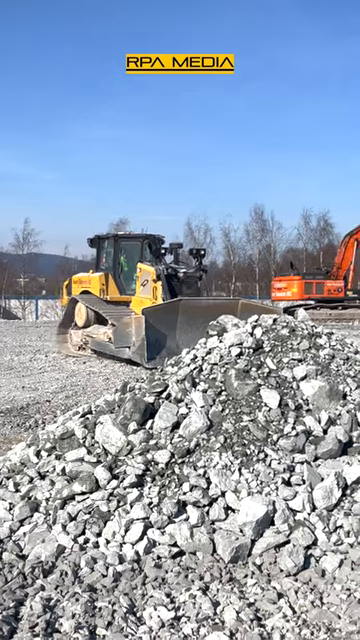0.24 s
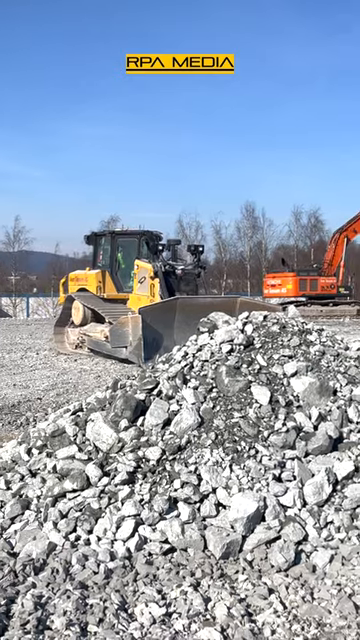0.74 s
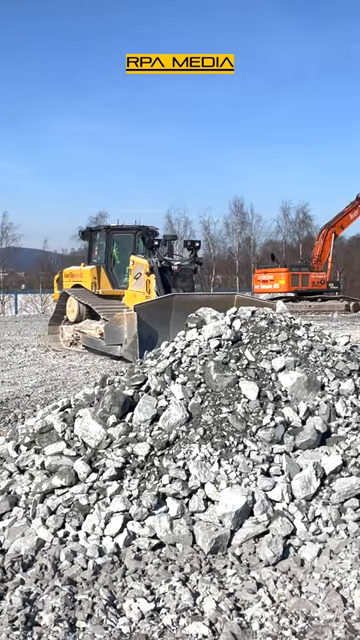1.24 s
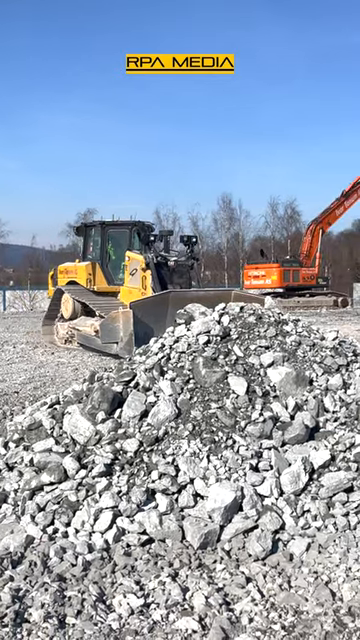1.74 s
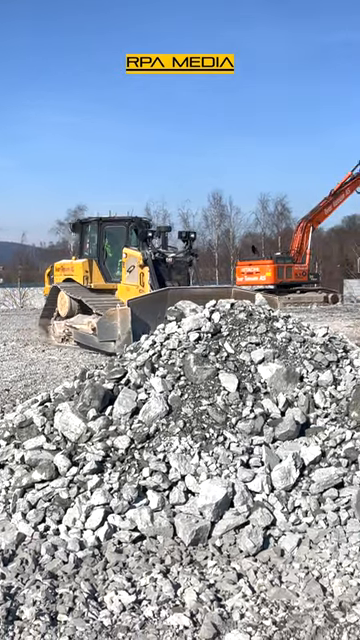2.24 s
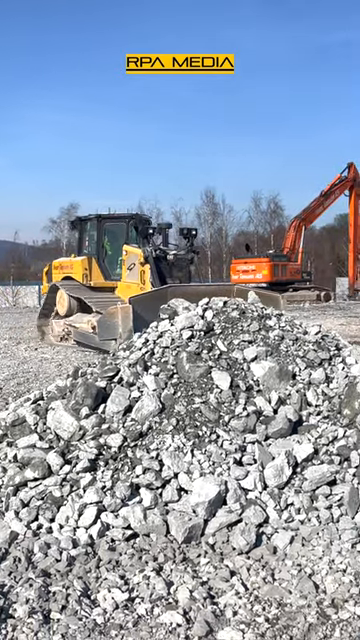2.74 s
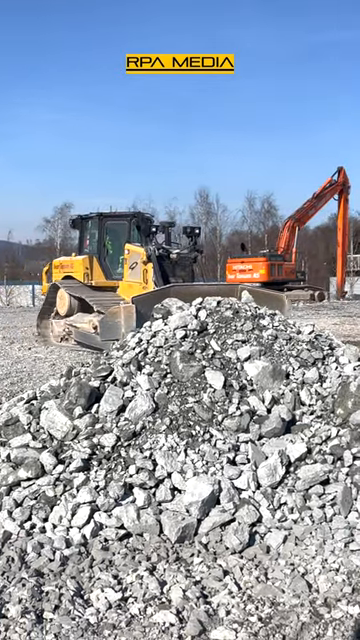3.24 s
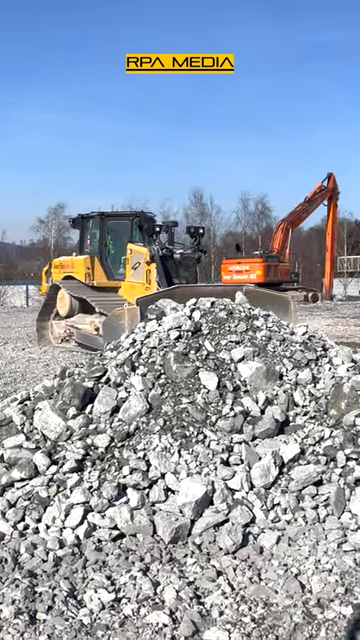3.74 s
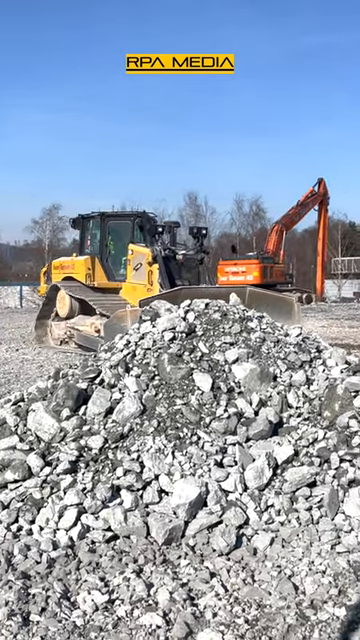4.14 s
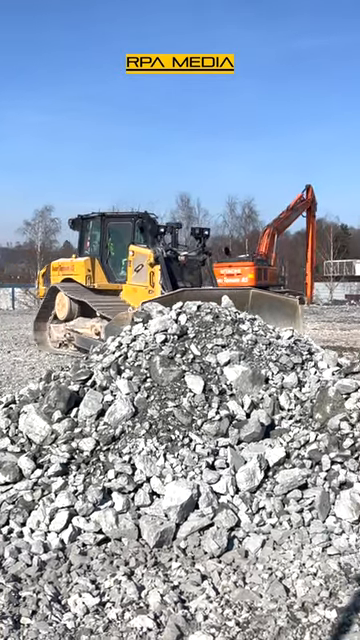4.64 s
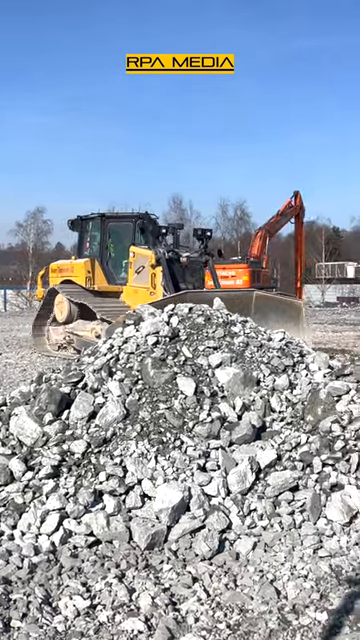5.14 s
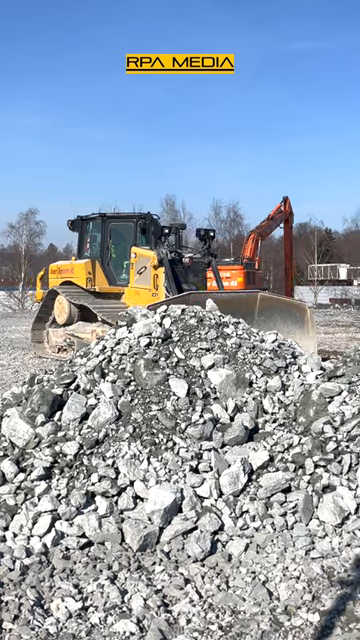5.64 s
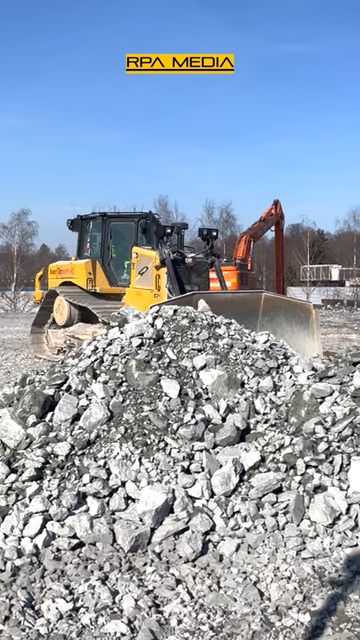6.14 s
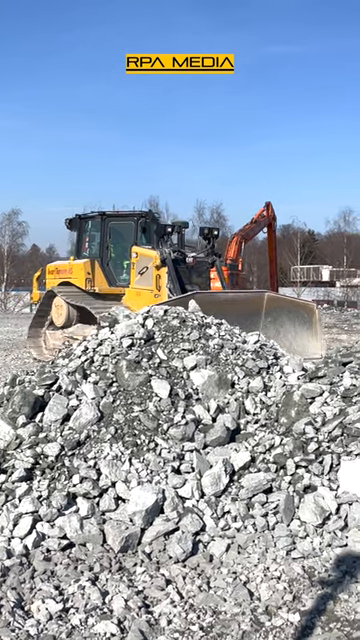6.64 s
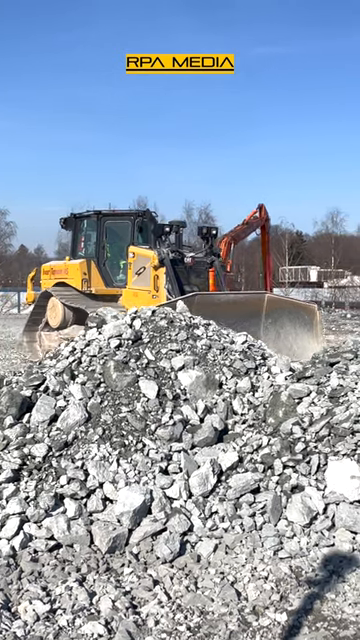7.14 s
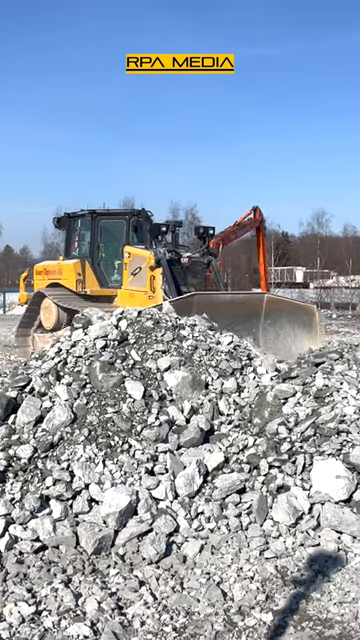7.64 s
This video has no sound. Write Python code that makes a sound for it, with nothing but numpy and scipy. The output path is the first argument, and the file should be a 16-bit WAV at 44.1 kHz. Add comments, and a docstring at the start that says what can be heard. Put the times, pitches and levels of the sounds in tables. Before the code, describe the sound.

Stones knock, grate and tumble ahead of a crawler dozer, over clanking track links, a steady engine and light wind buffeting.

```python
"""A crawler dozer shoves broken stone across a yard, heard from a little way off on one microphone.
Its six-cylinder diesel drones as firing pulses ring the exhaust pipe; steel track links slam home over
the sprockets and dry pins squeak. Stones knock, crunch, split and chink at the blade and grate along it
in stick-slip. Gusts buffet the microphone, whose signal is widened to two channels by a filter with a
slight wobble in phase."""
import sys
import numpy as np
from scipy import signal
from scipy.fft import rfft, irfft, next_fast_len
from scipy.io import wavfile
from scipy.ndimage import uniform_filter1d

SR = 44100
rng = np.random.default_rng(int(sys.argv[2]) if len(sys.argv) > 2 else 0)


def master_out(mix):
    """Clip the mix to full scale and print it as 16-bit PCM to the path in sys.argv[1]."""
    frames = np.transpose(np.atleast_2d(mix))
    ceiling = np.clip(frames, -1, 1)
    pcm = np.round(ceiling * 32767).astype(np.int16)
    wavfile.write(sys.argv[1], SR, pcm)


N = 347949

# diesel, slowing a little as the load grows: (time [s], firing rate [Hz], rumble [dB], deep hum [dB])
DIESEL_RUN = [(0.0, 94.3, -23.5, -49), (0.83, 94.9, -25.5, -31), (1.78, 94.9, -24.5, -36),
              (2.0, 91.9, -27, -31), (3.43, 94.7, -24.5, -27.5), (3.8, 91.7, -27.5, -29),
              (4.61, 94.3, -25.5, -33.5), (5.07, 92.26, -25.5, -26.5), (6.61, 92.7, -22, -31),
              (6.9, 88.2, -20.5, -22), (7.08, 91.4, -21.5, -31), (7.54, 90.6, -22, -31),
              (7.62, 97.5, -18, -33), (7.89, 89.8, -22, -28)]
# the six firings of one cycle: (relative strength [dB])
FIRING_DB = [2, -19, 4, -14, 5, -8]
# crankshaft tones beside the firing tone, which is order 3: (order [per turn], level [dB])
CRANK_TONES = [(2.5, -39), (4, -39.5), (5, -38.5)]
# exhaust pipe resonances: (frequency [Hz], width [Hz], relative level [dB])
PIPE_MODES = [(50, 3.7, -15), (119, 29.5, 12.5), (154, 110, -23), (198, 16, 10.5), (253, 5, -26)]
# whine of the gears: (frequency [Hz], width [Hz], level [dB])
GEAR_BANDS = [(1710, 4, -48)]
# spectra of engine rumble and cooling fan: (frequency [Hz], relative level [dB])
RUMBLE_SPECTRUM = [(25, -32), (38, -18), (52, -4.5), (75, 4), (110, 0.5), (170, -5.5), (260, -3.5),
                   (400, -27)]
FAN_SPECTRUM = [(300, -5), (800, 19.5), (2000, -12), (4000, -7), (6000, -2), (9000, -0.5), (12000, -10)]

# track links slamming home: (time [s], relative level [dB], brightest at [Hz], relative thud [dB])
LINK_BLOWS = [(0.088, -6, 696, -18), (0.25, -6, 988, -25), (0.279, -9.5, 2560, -14),
              (0.456, -11, 1230, -27), (0.617, -8.5, 746, -14), (0.683, 0, 1690, -18),
              (0.747, -7.5, 1930, 2), (1.004, -0.5, 1080, -11), (1.171, -7, 715, -1),
              (1.201, -2.5, 1850, -31), (1.282, -7, 1860, -30), (1.413, -12.5, 2260, 3),
              (1.489, -7, 2830, -14), (1.541, 2, 1780, -5.5), (1.865, 0.5, 1280, -30),
              (1.936, -6.5, 666, -28), (2.101, -13, 1845, 1), (2.142, -11, 622, -24), (2.251, -10, 2220, 2),
              (2.281, -14, 673, 9.5), (2.392, -2.5, 710, -24), (2.478, -13, 627, 2),
              (2.699, -8.5, 1190, -24), (2.872, -12, 705, -13), (2.982, -8, 800, 2),
              (3.126, -16, 1010, -19), (3.262, -9, 800, -2), (3.306, -16, 1710, -37),
              (3.409, -14.5, 651, -23), (3.545, -14.5, 921, 7), (3.673, -12, 1680, -24),
              (3.792, -13.5, 872, -2), (3.924, -14.5, 676, -24), (4.061, -15, 1200, -15),
              (4.089, -12.5, 800, 7), (4.232, -12, 950, -12), (4.361, -15, 650, 6.5), (4.622, -15, 910, -1),
              (4.654, -15, 600, 9), (4.684, -12, 977, -4), (4.782, -11, 1180, -17),
              (4.934, -10.5, 643, -20), (5.19, -9.5, 740, 2), (5.336, -10, 955, -14),
              (5.469, -17.5, 755, 7), (5.641, -9.5, 616, -32), (5.748, -7, 651, -13),
              (5.887, -8.5, 823, -18), (5.938, -5.5, 724, -20), (6.159, -19, 700, 12),
              (6.242, -35, 606, -12), (6.297, -23, 600, -5), (6.4, -31, 739, -29), (6.433, -12, 2200, -25),
              (6.484, -13.5, 1860, 3), (6.54, -15, 2350, -18), (6.719, -8, 599, -25),
              (6.809, -28, 1730, -32.5), (6.928, -17, 631, -12), (6.994, -7, 627, -15),
              (7.169, -10, 654, -12), (7.229, -5, 1920, 1.5), (7.466, -19, 600, 11.5), (7.614, -14, 740, 8),
              (7.683, -23, 759, -15), (7.721, -24, 3030, 2), (7.824, -10.5, 3440, 10)]
# modes of a track link: (frequency [Hz], relative level [dB], t60 when struck hard [s])
LINK_MODES = [(520, -7, .05), (646, -3, .07), (716, -4, .07), (830, -7, .05), (947, -5, .05),
              (1030, -5, .05), (1180, -6, .05), (1320, -6, .05), (1530, -10, .04), (1750, -10, .06),
              (1879, -3.5, .1), (1960, -7, .07), (2137, -9, .1), (2260, -11, .1), (2470, -11, .1),
              (2848, -6, .12), (3004, -11, .1), (3160, -8, .07), (3370, -10, .07), (3620, -13, .06),
              (3900, -14, .06)]
# links hanging free after a blow: (time [s], frequency [Hz], level [dB], t60 [s])
FREE_LINKS = [(.686, 1913, -15, 0.17), (0.689, 3050, -25, .2), (.69, 687, -16, 0.24),
              (0.751, 1950, -30, 0.12), (1.008, 2864, -19, 0.28), (1.015, 1870, -25, 0.25),
              (1.005, 997, -20, 0.15), (1.172, 720, -13.5, .08), (1.203, 1860, -36, 0.28),
              (1.225, 3010, -22, 0.45), (1.283, 1870, -20.5, 0.19), (1.285, 2095, -22, 0.26),
              (1.54, 1930, -31, 0.13), (1.543, 2840, -23, 0.22), (1.867, 1900, -17, 0.33),
              (1.868, 3230, -23, 0.25), (1.935, 3400, -23, 0.097), (2.155, 3140, -23, 0.072),
              (2.394, 1900, -23, 0.61), (2.393, 2840, -20, 0.2), (2.475, 3370, -32, 0.09),
              (7.23, 3200, -18, 0.13), (7.23, 2180, -22, 0.091), (7.232, 944, -20, .1),
              (.687, 1237, -22, 0.24), (0.753, 1280, -20, .1), (1.543, 672, -14.5, 0.13),
              (1.867, 1004, -17, 0.21), (2.394, 1015, -19.5, 0.13), (2.699, 1217, -20, 0.11),
              (2.699, 685, -20.5, 0.16), (2.701, 1842, -28, .1), (2.701, 3200, -28, .08),
              (2.872, 1300, -26, 0.067), (2.98, 3150, -21, 0.094), (2.984, 2150, -25, .08),
              (3.178, 1660, -23, 0.074), (0.278, 2500, -18, 0.18), (3.268, 1054, -23, .1),
              (3.305, 1660, -18.5, 0.092), (3.673, 2900, -26, .1), (3.922, 1840, -22, 0.063),
              (3.96, 1180, -23, .08), (4.09, 740, -26, 0.24), (4.234, 1010, -29, .1),
              (4.783, 1160, -21, .08), (5.337, 1800, -24, .08), (5.342, 1300, -22, .08)]
# dry track pins: (time [s], length [s], frequency [Hz], width [Hz], level [dB])
PIN_SQUEAKS = [(.57, .12, 13500, 130, -38), (.87, .1, 13450, 120, -47), (1.22, .09, 13500, 130, -38),
               (1.43, .16, 13470, 130, -38), (.02, .12, 13500, 120, -41), (1.05, .13, 13500, 120, -48),
               (1.96, .18, 13500, 80, -43), (1.13, .11, 9000, 60, -32), (1.75, .15, 9100, 50, -36),
               (.28, .17, 9110, 40, -39), (0, .12, 8130, 40, -35), (.15, .2, 8130, 40, -39),
               (.03, .12, 4500, 150, -33), (.82, .05, 10090, 60, -41), (.015, .08, 5100, 50, -33),
               (.27, .08, 5050, 60, -35)]

# steady roll of the heap: (time [s], big stones [dB], crunch on the blade [dB], grit [dB], fine grit [dB])
HEAP_ROLL = [(0.0, -27.5, -26, -26.5, -31), (0.17, -26, -28.5, -29.5, -35.5),
             (0.42, -27.5, -32, -39.5, -44.5), (1.32, -31, -30, -34, -37), (1.65, -26, -34, -42, -54),
             (2.0, -29, -32, -36, -43), (2.52, -26.5, -36, -53, -65), (2.94, -30.5, -37, -58.5, -60),
             (3.29, -25.5, -34, -46, -65), (4.04, -29, -37, -48, -59), (5.56, -26, -33.5, -40.5, -66),
             (6.5, -21.5, -26.5, -30, -46), (6.64, -19.5, -27, -30, -56), (6.97, -22.5, -24, -27, -46),
             (7.19, -22, -29.5, -32, -46), (7.45, -25.5, -35, -40, -57), (7.74, -21.5, -28.5, -31, -45),
             (7.89, -19, -21.5, -25.5, -49)]
# gravel off a track shoe or the heap:
# (time [s], length [s], grit [dB], fine grit re grit [dB], crunch re grit [dB])
GRAVEL_SPILLS = [(0.061, 0.086, -24.5, -16, -4), (0.224, 0.18, -27.5, -2, 2), (0.507, 0.035, -37, -14, 7.5),
                 (0.639, 0.11, -30, -3.5, 0), (0.824, 0.29, -31, -4, -3), (1.115, 0.15, -28.5, -8, -18),
                 (1.32, 0.04, -29, -6, -3), (1.41, 0.065, -32.5, -9, 3), (1.477, 0.1, -30.5, -5.5, 2),
                 (1.606, 0.039, -37, 2, 2), (1.714, 0.032, -27, -3, 3), (1.765, 0.072, -31, -15, 1),
                 (1.854, 0.038, -29, -19, 9.5), (1.957, 0.17, -34, -2, -1), (2.148, 0.061, -34, -6, -2),
                 (2.243, 0.13, -37.5, -7, 9), (2.383, 0.026, -33, -6, 17), (2.44, 0.038, -41.5, 2, 13),
                 (2.627, 0.031, -41, -9, 5), (2.682, 0.13, -38.5, -8, 7), (2.847, 0.19, -36, -6, 2),
                 (3.12, 0.086, -38.5, -20, 10), (3.2, 0.074, -39, -7, 7), (3.338, 0.043, -34.5, -16, 1),
                 (3.4, 0.065, -40.5, -4, 8), (3.522, 0.14, -39, -9, 7), (3.65, 0.046, -31, -11, 1.5),
                 (3.705, 0.038, -35, -9, -6), (3.915, 0.066, -38, -7, 6), (4.05, 0.071, -33.5, -12, 2),
                 (4.212, 0.054, -37, -7, 4), (4.346, 0.039, -34, -5, -3), (4.509, 0.028, -36, -9, -7),
                 (4.617, 0.078, -39, -9, -5), (4.714, 0.033, -41, -11, 3), (4.76, 0.079, -41, -7, -1),
                 (4.913, 0.037, -34.5, -8, 0), (4.97, 0.067, -35, -19, 7), (5.054, 0.044, -35, -12.0, -4),
                 (5.178, 0.08, -33, -12, -5), (5.298, 0.058, -34.5, -1.5, 0),
                 (5.389, 0.031, -31.5, -16, -1), (5.455, 0.033, -37, -8, 3), (5.49, 0.047, -35.5, -23, 3),
                 (5.62, 0.091, -32, -11, -2), (5.737, 0.05, -29, -12, 4.5), (5.888, 0.105, -28, -12, 1.5),
                 (6.01, 0.098, -28.5, -14, 7), (6.13, 0.044, -36, -11, 5), (6.225, 0.068, -25.5, -48, -10),
                 (6.295, 0.046, -29.5, -16, 6), (6.46, 0.14, -25.5, -9, 3), (6.595, 0.05, -28.5, -13, 6),
                 (6.705, 0.074, -21.5, -35, -1), (6.833, 0.068, -26, -23, -13),
                 (6.913, 0.036, -27, -34, -13), (7.041, 0.12, -23, -20, -3.5), (7.22, 0.024, -29, -23, -2),
                 (7.331, 0.12, -33.5, -15.0, 6), (7.434, 0.065, -32.5, -9, 5),
                 (7.608, 0.032, -32, -18.0, -8), (7.718, 0.058, -28, -22, -8),
                 (7.813, 0.028, -23, -16, 4.5)]
# spectra of the four sizes of stone, largest first: (frequency [Hz], relative level [dB])
KNOCK_SPECTRUM = [(150, -51), (250, -4), (500, 0), (900, -6.5), (1500, -8.5), (2400, -14.5)]
CRUNCH_SPECTRUM = [(900, 5), (1600, 4.5), (2300, 5.5), (3200, 6.5), (4300, 0), (5600, -51)]
GRIT_SPECTRUM = [(3500, -32), (4800, 4), (5400, 1), (6500, -3.5), (8000, -4), (9500, -19), (11000, -29)]
FINE_SPECTRUM = [(7500, -39), (9300, -14.5), (10500, -16.5), (12000, -23.5), (12800, -24), (14000, -29),
                 (15000, -39)]
# stones dragged along the blade, the lowest notes being groans of the plate:
# (time [s], length [s], frequency [Hz], width [Hz], level [dB])
BLADE_SCRAPES = [(.02, .15, 3100, 300, -30), (.22, .15, 2900, 400, -28), (.84, .04, 2480, 80, -32),
                 (.87, .04, 2980, 80, -33), (1.405, .07, 2300, 60, -29), (5.335, .04, 1500, 600, -28),
                 (5.95, .06, 1800, 200, -32), (6.24, .06, 5400, 500, -36), (6.43, .06, 2250, 90, -27),
                 (6.45, .05, 3300, 120, -30), (6.5, .08, 3350, 120, -31), (6.47, .1, 5000, 600, -36),
                 (6.6, .18, 2500, 500, -28), (6.43, .16, 2300, 350, -29), (6.85, .06, 5300, 400, -37),
                 (6.91, .05, 5900, 300, -36), (7.07, .1, 5100, 500, -37), (6.53, .06, 2350, 70, -24),
                 (6.5, .05, 1720, 90, -25), (6.605, .045, 2780, 70, -26), (6.635, .04, 2200, 120, -27),
                 (6.69, .03, 2750, 70, -27), (6.7, .07, 2300, 100, -29), (6.72, .06, 3400, 150, -27),
                 (6.73, .025, 1000, 60, -26), (6.8, .025, 1700, 70, -26), (6.845, .025, 3200, 90, -28),
                 (6.85, .3, 210, 12, -28), (7.75, .14, 268, 15, -26), (1.55, .3, 160, 20, -25),
                 (2.2, .35, 150, 25, -29), (6.7, .4, 520, 120, -28), (7.225, .03, 3200, 500, -24),
                 (7.25, .03, 3200, 400, -28), (6.86, .22, 650, 250, -27), (6.72, .05, 520, 60, -25),
                 (.0, .16, 4200, 700, -31), (.23, .12, 3700, 800, -29), (4.075, .03, 3050, 140, -37),
                 (4.22, .035, 3150, 350, -34), (4.24, .02, 4000, 120, -38), (4.62, .03, 3050, 140, -37),
                 (4.08, .1, 550, 250, -31), (.95, .04, 1780, 50, -32), (7.335, .03, 4300, 200, -31),
                 (6.3, .04, 5400, 400, -34), (6.63, .04, 5700, 500, -33), (.09, .07, 3150, 300, -29),
                 (.0, .13, 1500, 600, -31), (.3, .06, 3100, 600, -30), (.22, .05, 5250, 200, -30),
                 (7.71, .18, 3100, 500, -25), (7.85, .05, 3450, 90, -23), (7.81, .04, 3300, 300, -24),
                 (7.71, .03, 3050, 200, -23), (7.77, .035, 3150, 250, -23), (7.73, .035, 3500, 300, -24),
                 (.27, .03, 2500, 50, -21), (.335, .015, 2450, 80, -28), (.26, .05, 3950, 70, -31),
                 (.26, .04, 3000, 120, -28), (.05, .11, 3050, 120, -26), (.215, .04, 4450, 150, -30),
                 (.53, .05, 4000, 60, -34), (1.475, .025, 2750, 120, -27), (1.495, .03, 3050, 120, -28)]
# stones splitting under the steel: (time [s], level [dB], t60 [s])
STONE_SPLITS = [(.218, -22.5, 0.96), (.752, -37, 0.071), (.828, -27, 0.37), (1.084, -24, 0.6),
                (1.331, -19.5, .15), (1.729, -16.5, 0.19), (3.129, -32, .12), (4.239, -32, 0.076),
                (4.519, -29, .12), (4.627, -33, .1), (4.787, -28, .1), (5.319, -36, 0.14),
                (5.887, -42, .15), (7.229, -22, 0.11)]
# spectrum of a split: (frequency [Hz], relative level [dB])
SPLIT_SPECTRUM = [(800, -1), (1500, -23), (3000, 3.5), (5000, 0), (8000, -5.5), (11000, -9), (14000, -22)]
# small stones striking steel: (time [s], relative level [dB], frequency [Hz])
STONE_CHINKS = [(.02, -22, 7400), (.075, -16, 6500), (.1, -16, 6100), (0.218, -10, 5240), (.22, -11, 4450),
                (.25, -11, 6700), (0.277, -7, 4070), (.345, -26, 7500), (0.398, -18, 6700),
                (0.831, -12, 5117), (1.731, -24, 6550), (3.6666, -37, 6000), (3.7239, -21, 5210),
                (4.2393, -22, 5160), (4.3745, -21, 5760), (4.519, -16, 5060), (4.7311, -24, 5700),
                (4.996, -22, 5700), (5.2101, -30, 6300), (5.3184, -15, 5110), (5.7538, -20, 5330),
                (6.0905, -16, 5500), (6.2219, -18, 5340), (6.2497, -10, 5400), (6.404, -17, 5600),
                (6.6293, -15, 5300), (6.6934, -27, 5500), (6.914, -12, 6000), (7.23, -14, 5220),
                (7.465, -16, 5150), (7.618, -19, 5470), (7.7293, -20, 5200), (7.818, -18, 5640)]

# wind on the microphone: (time [s], length [s], level [dB])
WIND_GUSTS = [(0.06, 0.079, -24), (1.543, 0.096, -18), (1.697, .2, -25), (3.548, 0.25, -19.5),
              (3.74, 0.21, -21), (3.948, 0.26, -28), (5.45, 0.16, -41), (5.623, 0.13, -14.5),
              (5.755, 0.26, -18), (6.02, 0.073, -32), (6.786, 0.21, -21), (7.045, 0.13, -32),
              (7.238, 0.11, -33), (7.593, 0.091, -20.5), (7.753, 0.079, -19)]
# spectrum of the buffeting: (frequency [Hz], relative level [dB])
WIND_SPECTRUM = [(28, -27), (42, -1), (60, -2), (90, 1), (130, -7), (220, -23)]
# balance of right channel against left: (frequency [Hz], level [dB])
RIGHT_BALANCE = [(390, 0), (500, -5.5), (570, -7.3), (760, -6.5), (850, -3.6), (1000, -9), (1120, -14),
                 (1400, -2), (1600, -2), (1900, 0)]
# lag of right channel behind left: (frequency [Hz], lag [cycles])
RIGHT_DELAY = [(200, 0), (500, .115), (620, .07), (1000, .12), (1240, -.09), (1470, .04), (1600, 0),
               (2200, 0), (3500, .055), (4000, .1), (4500, .25), (4900, .5), (5300, .863), (5600, 1),
               (6200, 1), (8400, 1.5), (9500, 1.5), (11900, 2)]
# phase wobble of each channel: (frequency [Hz], depth [dB re one radian])
PHASE_WOBBLE = [(30, -30), (200, -30), (500, -22), (1100, -14), (1900, -24), (3000, -14), (4100, -11),
                (4780, -11), (4900, -28), (5020, -11), (5450, -11), (5700, -35), (6200, -35), (6600, -9),
                (7900, -7), (8500, -30), (9500, -30), (10000, -10), (11000, -6), (11600, -7), (11950, -35),
                (13100, -30), (13500, -9), (15000, -5)]


def amp(db):
    """Decibels to gain."""
    return 10 ** (np.asarray(db) / 20)


def rms_one(x):
    """Scale to rms 1."""
    return x / np.sqrt(np.mean(x ** 2) + 1e-20)


def in_time(rows):
    """Columns of a curve table, sample by sample."""
    s, *columns = np.transpose(rows)
    return [np.interp(np.arange(N) / SR, s, c) for c in columns]


def drift(rate):
    """Smooth random curve of rms 1, changing about rate times a second."""
    step = 40
    r = np.exp(-2 * step * np.pi * rate / SR)
    slow = signal.lfilter([1], [1, -2 * r, r * r], rng.standard_normal(N // step + 2002))[2000:]
    return np.interp(np.arange(N) / step, np.arange(len(slow)), rms_one(slow))


def shaped(x, spectrum):
    """Colour a signal by a spectrum table; rms 1."""
    hz, level_db = np.transpose(spectrum)
    grid = np.log(np.fft.rfftfreq(len(x), 1 / SR) + 1)
    gain = amp(np.interp(grid, np.log(hz), level_db, left=-80, right=-80))
    return rms_one(irfft(rfft(x) * gain, len(x)))


def resonate(x, hz, width_hz):
    """Two-pole resonance with gain 1 at its peak."""
    r = np.exp(-np.pi * width_hz / SR)
    poles = [1, -2 * r * np.cos(2 * np.pi * hz / SR), r * r]
    return signal.lfilter([(1 - r * r) / 2, 0, (r * r - 1) / 2], poles, x + 1e-18)


def grains(per_s, spread_db, clumps_db):
    """Random contacts of uneven size that come in clumps."""
    sizes = amp(spread_db * np.minimum(rng.exponential(1, N), 4)) * rng.choice([-1, 1], N)
    return sizes * (rng.random(N) < per_s / SR) * amp(clumps_db * drift(10))


def tone(level_db, cycles):
    """Sine at an rms level, following a running count of cycles."""
    return np.sqrt(2) * amp(level_db) * np.sin(2 * np.pi * cycles)


def diesel():
    """Firing and crankshaft tones with exhaust, rumble, a faint gear whine, a deep hum and fan rush."""
    firing_hz, rumble_db, hum_db = in_time(DIESEL_RUN)
    firings = np.cumsum(firing_hz) / SR
    firing = tone(-28.5 + 2 * drift(12), firings)
    crank = sum(tone(db + 3.4 * drift(4.5), order / 3 * firings) for order, db in CRANK_TONES)
    pipe = exhaust(firings, level_db=-35)
    rumble = amp(rumble_db + 2.5 * drift(19)) * shaped(rng.standard_normal(N), RUMBLE_SPECTRUM)
    whine = sum(amp(db) * rms_one(resonate(rng.standard_normal(N), hz, width))
                for hz, width, db in GEAR_BANDS)
    hum = tone(hum_db + 2.5 * drift(9.5), np.cumsum(49.5 + 1.42 * drift(1.9)) / SR)
    fan = amp(-36) * shaped(rng.standard_normal(N), FAN_SPECTRUM)
    return firing + crank + pipe + rumble + whine + hum + fan


def exhaust(firings, level_db):
    """Each cylinder in turn sends a pulse of uneven strength into the pipe's resonances."""
    fired = np.flatnonzero(np.diff(np.floor(firings)))
    pulses = np.zeros(N)
    pulses[fired] = amp(np.resize(FIRING_DB, len(fired)) + 6.6 * drift(30)[fired])
    pipe = sum(amp(db) * rms_one(resonate(resonate(pulses, hz, width), hz, 4 * width))
               for hz, width, db in PIPE_MODES)
    return amp(level_db) * rms_one(pipe)


def link_rattle(noise, t, closing_s=0.001, hold_s=0.034, burst_s=0.006, stutter_db=2):
    """The faces of a link meet in a hard first contact, then rattle briefly in uneven bursts."""
    closing = 1 - np.exp(-t / closing_s)
    first_contact = amp(3.5) * np.exp(-t / 0.004)
    hold = np.exp(-(t / hold_s) ** 2)
    bursts = rms_one(uniform_filter1d(noise[::-1], size=round(burst_s * SR)))
    return noise * closing * (first_contact + hold) * amp(stutter_db * bursts)


def track_clanks(dull_hz=6100):
    """Each clank is a rattle that rings the link's modes, with a knock, a thud below and a crack above."""
    out, t = np.zeros(N + SR), np.arange(SR // 4) / SR
    low = signal.butter(2, [150, 700], "band", fs=SR, output="sos")
    high = signal.butter(3, [4500, 9000], "band", fs=SR, output="sos")
    broad = signal.butter(2, [450, 2900], "band", fs=SR, output="sos")
    hz, mode_db, t60 = np.transpose(LINK_MODES)[:, :, None]
    for s, level_db, bright_hz, thud_db in LINK_BLOWS:
        scatter_db = 3 * rng.standard_normal(hz.shape)
        noise = rng.standard_normal(len(t))
        rattle = link_rattle(noise, t)
        nearness_db = -4 * np.abs(np.log2(hz / bright_hz))   # where the blow lands favours nearby modes
        freedom = np.interp(level_db, [-18, -6], [0.45, 1])   # softly struck links stay pressed down
        decays = amp(mode_db + nearness_db + scatter_db - 60 * t / (t60 * freedom))
        modes = np.sum(decays * np.sin(2 * np.pi * hz * t), axis=0)
        hardest_contacts = rattle * (np.abs(noise) > 1.8)
        ringing = signal.fftconvolve(hardest_contacts, modes)[:len(t)]
        knock = signal.sosfilt(broad, rattle) + 2.84 * resonate(rattle, bright_hz, 0.5 * bright_hz)
        body = ringing / np.max(np.abs(ringing)) + amp(-13.5) * knock
        thud = amp(thud_db + 5) * signal.sosfilt(low, rattle)
        crack = amp(-27.5) * signal.sosfilt(high, rattle)
        out[round(s * SR):][:len(t)] += amp(level_db - 7) * (body + thud + crack)
    # distance and the heap dull the clanks on their way to the microphone
    return signal.sosfilt(signal.butter(4, dull_hz, fs=SR, output="sos"), out[:N])


def link_rings(rise_s=0.0011, beat_hz=43.5):
    """A link hanging free sings on one mode, beating against a weaker twin as it dies away."""
    out, t = np.zeros(N + SR), np.arange(SR // 2) / SR
    for (s, hz, level_db, t60), phase in zip(FREE_LINKS, rng.random(len(FREE_LINKS))):
        pair = np.sin(2 * np.pi * hz * t) + 0.36 * np.sin(2 * np.pi * ((hz + beat_hz) * t + phase))
        envelope = amp(level_db - 60 * t / t60) * (1 - np.exp(-t / rise_s))
        out[round(s * SR):][:len(t)] += envelope * pair
    return out[:N]


def stone_heap():
    """Big stones knock, smaller pieces crunch denser and higher; all surge a little as the heap slips."""
    knock_db, crunch_db, grit_db, fine_db = in_time(HEAP_ROLL)
    _, _, spill_db, finer_db, coarser_db = np.transpose(GRAVEL_SPILLS)
    dull = rms_one(grains(per_s=5000, spread_db=2.5, clumps_db=2.5))
    low_rings = fragments(per_s=1200, low_hz=291.2, high_hz=2680, q=20, turnover_db=1.5, count=24)
    high_rings = fragments(per_s=2500, low_hz=1511, high_hz=12010, q=180, turnover_db=3.2, count=72)
    knock = amp(knock_db) * shaped(dull + amp(-12) * low_rings, KNOCK_SPECTRUM)
    ticks = rms_one(grains(per_s=6000, spread_db=0.5, clumps_db=0.5))
    small = ticks + amp(-2) * signal.lfilter([1, -0.9], [1], high_rings)
    small /= np.sqrt(uniform_filter1d(small ** 2, size=SR // 2))   # the mix changes colour, not level
    crunch = np.hypot(amp(crunch_db), spills(spill_db + coarser_db)) * shaped(small, CRUNCH_SPECTRUM)
    grit = np.hypot(amp(grit_db), spills(spill_db)) * shaped(small, GRIT_SPECTRUM)
    fine = np.hypot(amp(fine_db), spills(spill_db + finer_db)) * shaped(small, FINE_SPECTRUM)
    return amp(1.13 * drift(5.5)) * (knock + crunch + grit + fine)


def fragments(per_s, low_hz, high_hz, q, turnover_db, count, damping_hz=12):
    """Struck fragments ring at their own pitches, coming and going as the heap turns over."""
    clicks = grains(per_s, spread_db=0.5, clumps_db=3.5)
    struck = rng.integers(0, count, N)
    pitches = np.geomspace(low_hz, high_hz, count) * amp(0.154 * rng.standard_normal(count))
    out = np.zeros(N)
    for k, hz in enumerate(pitches):
        hits = clicks * (struck == k) * amp(turnover_db * drift(11.4))
        out += rms_one(resonate(hits, hz, hz / q + damping_hz))   # packed stones damp each other
    return out / np.sqrt(count)


def spills(levels_db, rise_s=0.011, sag_db_per_s=41, t60=0.09):
    """Envelope of the spilling gravel: each spill swells, thins out as it runs and dies away."""
    power, t = np.zeros(N + SR), np.arange(SR // 2) / SR
    for (s, length, *_), db in zip(GRAVEL_SPILLS, levels_db):
        fading_db = sag_db_per_s * t + 60 * np.maximum(t - length, 0) / t60
        power[round(s * SR):][:len(t)] += ((1 - np.exp(-t / rise_s)) * amp(db - fading_db)) ** 2
    return np.sqrt(power[:N])


def stick_slip(notes, per_s, wander, judder_db):
    """Rubbing surfaces catch and slip, driving a narrow resonance that judders and wanders in pitch."""
    out, slips = np.zeros(N + SR), grains(per_s, spread_db=4, clumps_db=-2)
    stray, judder = wander * drift(17), amp(judder_db * drift(44))
    for s, length, hz, width, level_db in notes:
        at, size = round(s * SR), round(length * SR)
        span = slice(at, min(at + size, N))
        ringing = signal.hilbert(resonate(resonate(slips[span], hz, width), hz, 2 * width))
        bend_hz = hz * (stray[span] - stray[span].mean())
        note = np.real(ringing * np.exp(2j * np.pi * np.cumsum(bend_hz) / SR)) * judder[span]
        swell = np.sqrt(signal.windows.tukey(size, 0.6))[:len(note)]
        out[span] += amp(level_db) * rms_one(note) * swell
    return out[:N]


def stone_splits(rise_s=0.0016):
    """A stone gives way under the steel in a sudden burst of dense grit that dies away."""
    t = np.arange(N) / SR
    bursts = sum((1 - np.exp(-np.maximum(t - s, 0) / rise_s)) * amp(db - 60 * np.abs(t - s) / t60)
                 for s, db, t60 in STONE_SPLITS)
    return bursts * shaped(grains(per_s=4000, spread_db=3.5, clumps_db=1.5), SPLIT_SPECTRUM)


def stone_chinks(rise_s=0.0011, t60=0.08):
    """A small stone strikes steel: a short, high ring of two close modes."""
    out, t = np.zeros(N + SR), np.arange(SR // 8) / SR
    for s, level_db, hz in STONE_CHINKS:
        pair = np.sin(2 * np.pi * hz * t) + 0.6 * np.sin(2 * np.pi * 1.07 * hz * t)
        envelope = amp(level_db - 8 - 60 * t / t60) * (1 - np.exp(-t / rise_s))
        out[round(s * SR):][:len(t)] += envelope * pair
    return out[:N]


def wind():
    """Gusts right on the microphone: low, lumpy noise that swells and fades."""
    t = np.arange(N) / SR
    swell = sum(amp(db) * np.sin(np.pi * np.clip((t - s) / length, 0, 1)) for s, length, db in WIND_GUSTS)
    return swell * shaped(rng.standard_normal(N), WIND_SPECTRUM)


def scene():
    """The dozer, the stone and the wind meet at one microphone in the yard."""
    mono = diesel() + wind() + stone_heap() + track_clanks()
    mono += stone_chinks() + stone_splits() + link_rings()
    mono += stick_slip(BLADE_SCRAPES, per_s=3400, wander=0.0118, judder_db=2)
    mono += stick_slip(PIN_SQUEAKS, per_s=9600, wander=0.0025, judder_db=1.5)
    return np.array([mono, mono])


def record(dry):
    """Peaks are rounded, the capsule rolls off the top, and level and phase differences add width."""
    capsule_hz, strip_hz, cutoff_hz = 12800, 130, 15500
    left_share = 0.42   # part of the level difference made by lifting the left
    rounded = 1.08 * np.tanh(dry[0] / 1.31)
    mic = signal.sosfilt(signal.butter(6, capsule_hz, fs=SR, output="sos"), rounded)
    size = next_fast_len(N + 4096)
    hz = np.fft.rfftfreq(size, 1 / SR)
    balance_db = np.interp(hz, *np.transpose(RIGHT_BALANCE))
    lag = np.exp(-2j * np.pi * np.interp(hz, *np.transpose(RIGHT_DELAY)))
    lifted = rfft(mic, size) * amp(-left_share * balance_db)
    left, right = irfft([lifted, lifted * amp(balance_db) * lag], size)[:, :N]
    # a little of a quarter-turned copy swings the two channels' phases in opposite directions
    quarter_turn = 1j * amp(np.interp(hz, *np.transpose(PHASE_WOBBLE)))
    turned = rfft([left, -right], size) * quarter_turn
    strip = hz // strip_hz % 8   # neighbouring frequency strips wobble independently
    wobble = sum(drift(30) * irfft(turned * (strip == k), size)[:, :N] for k in range(8))
    top_cut = signal.cheby2(16, 80, cutoff_hz, fs=SR, output="sos")
    return signal.sosfilt(top_cut, np.array([left, right]) + wobble)


dry = scene()
out = record(dry)
master_out(out)
```